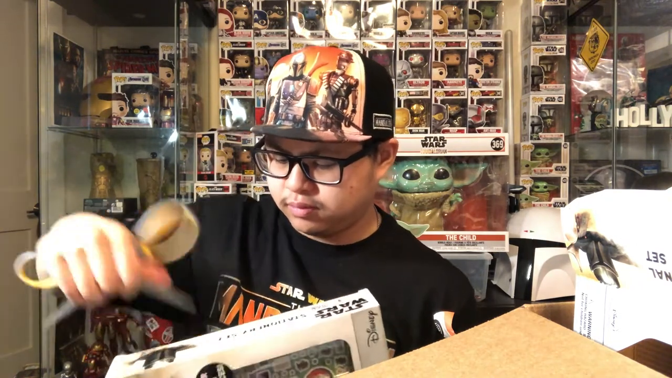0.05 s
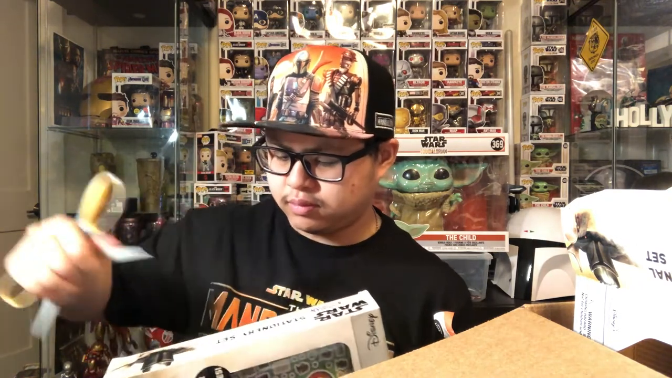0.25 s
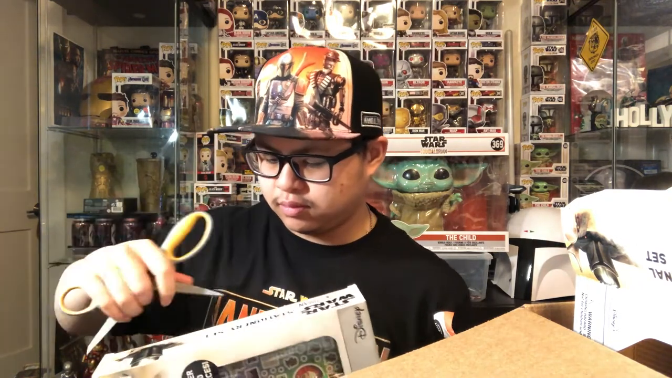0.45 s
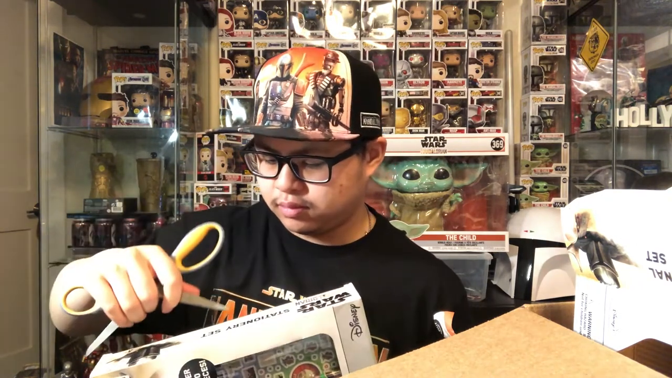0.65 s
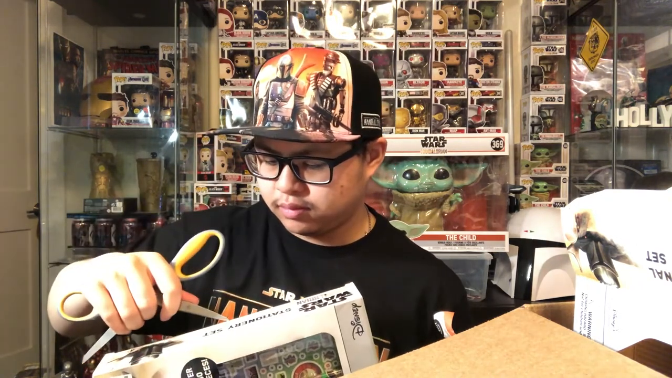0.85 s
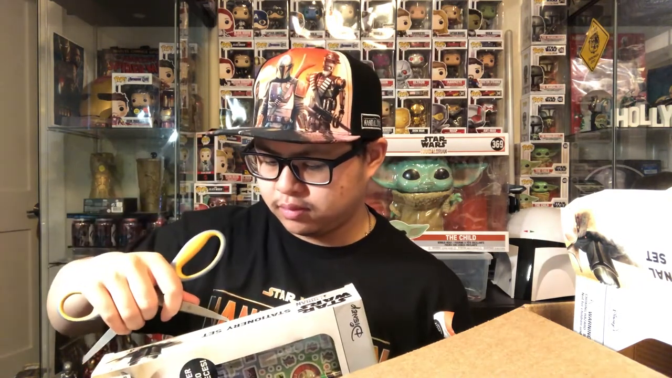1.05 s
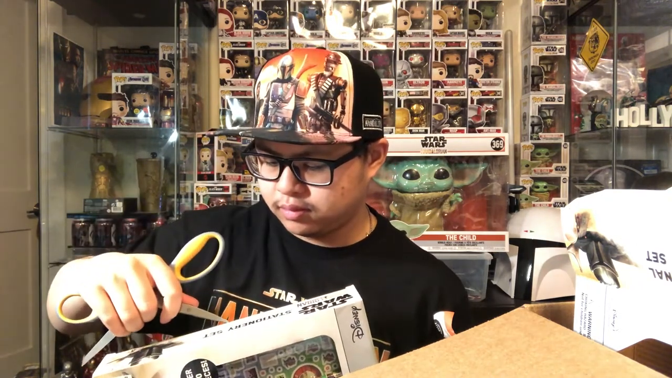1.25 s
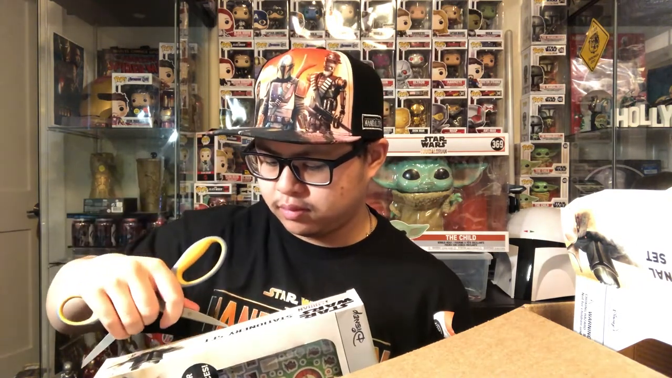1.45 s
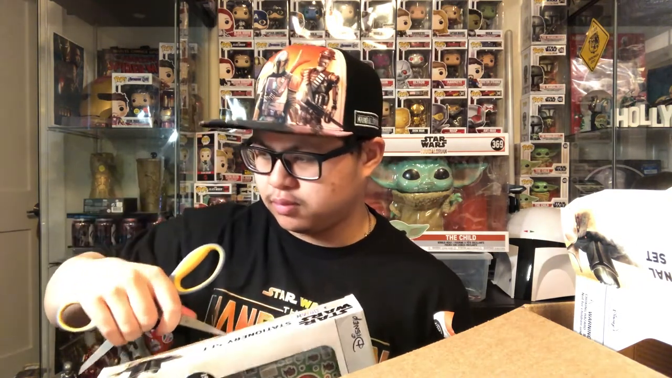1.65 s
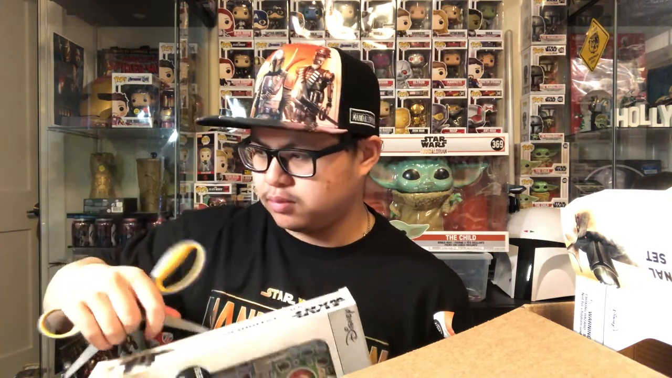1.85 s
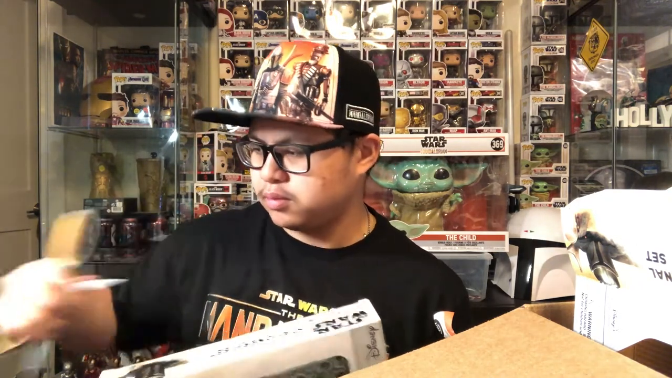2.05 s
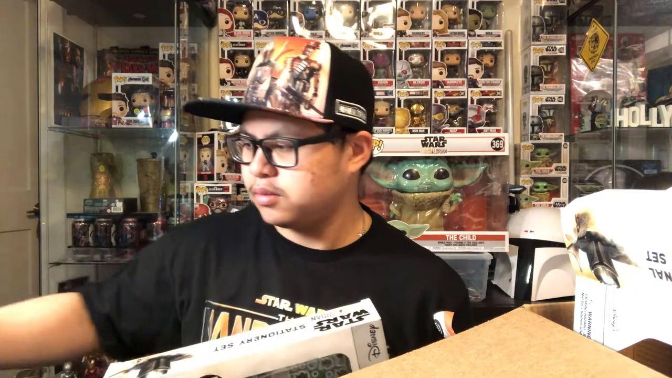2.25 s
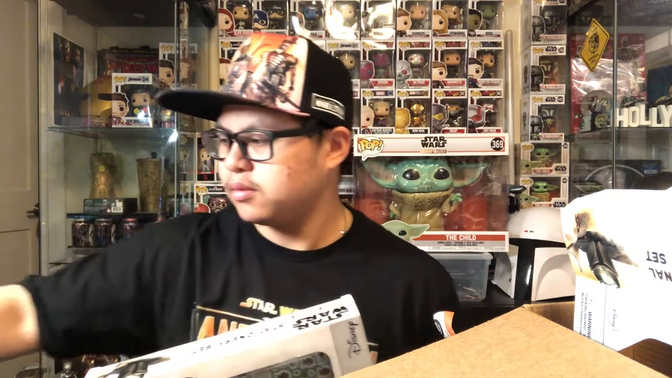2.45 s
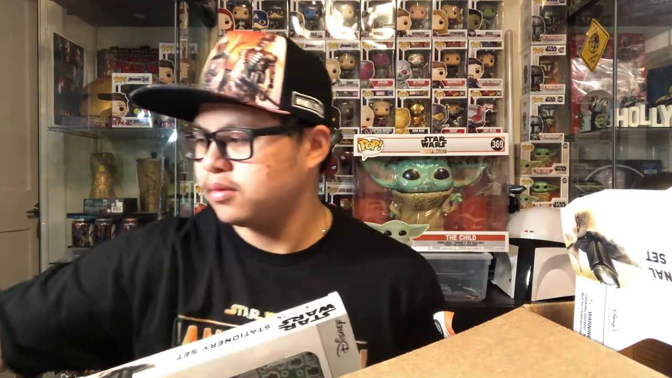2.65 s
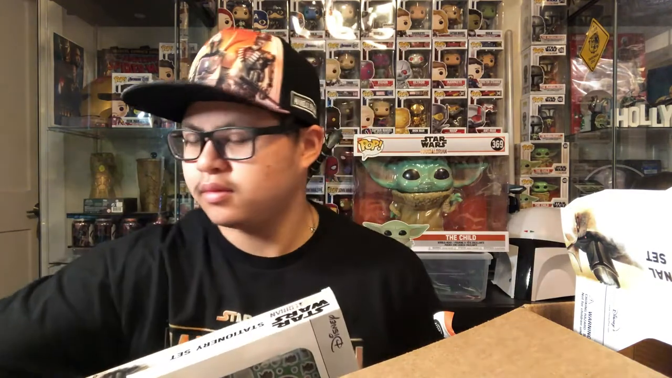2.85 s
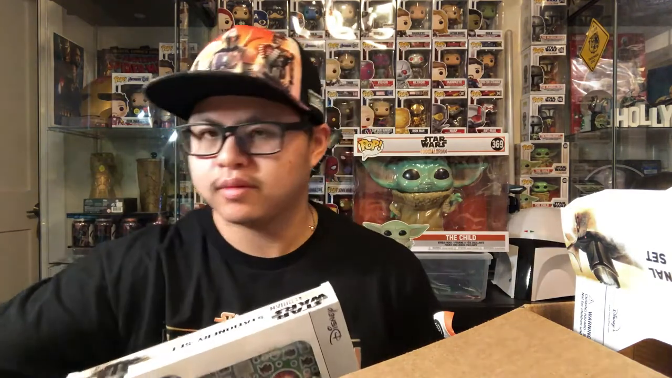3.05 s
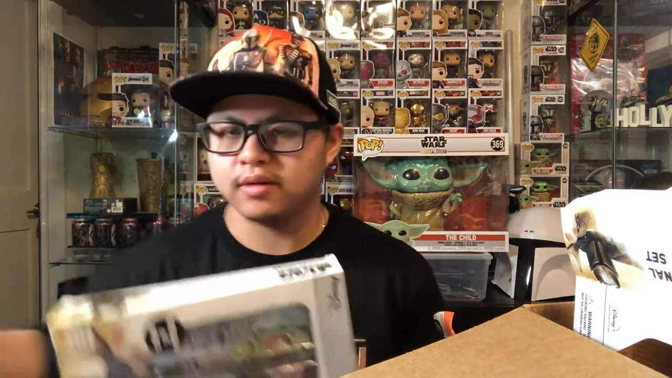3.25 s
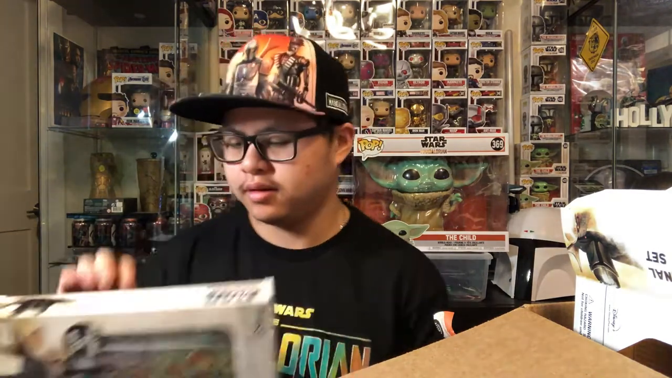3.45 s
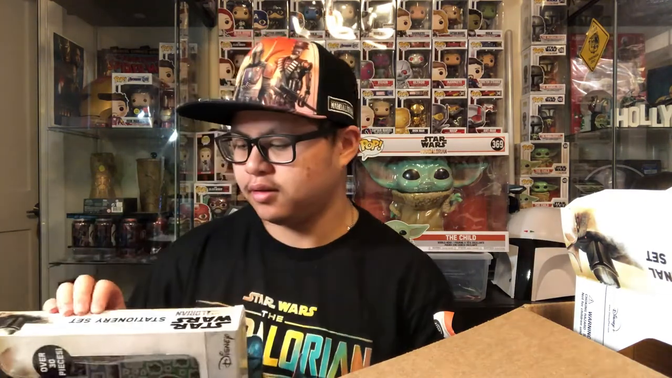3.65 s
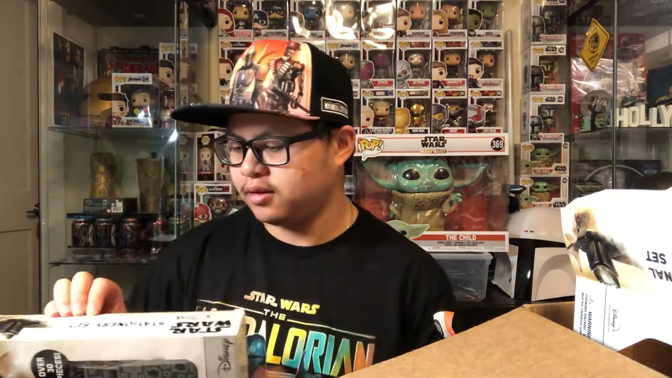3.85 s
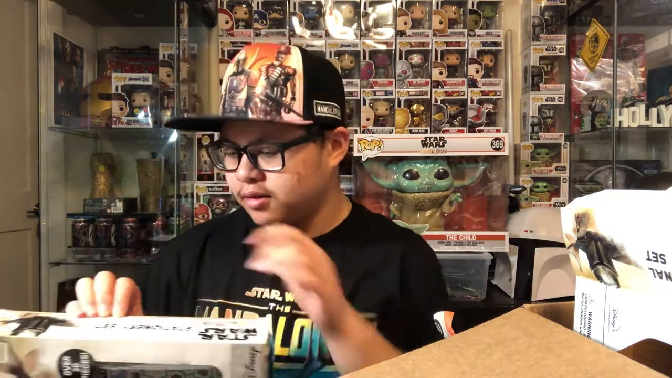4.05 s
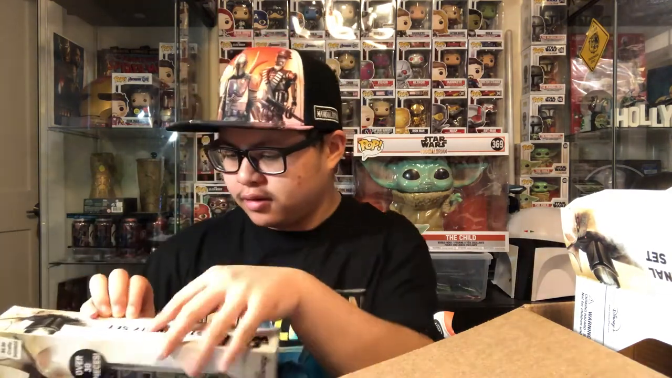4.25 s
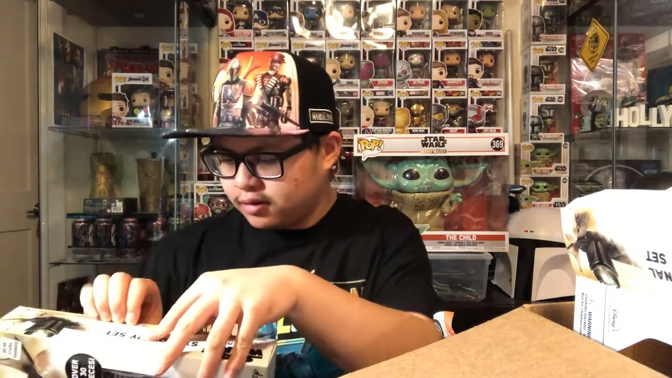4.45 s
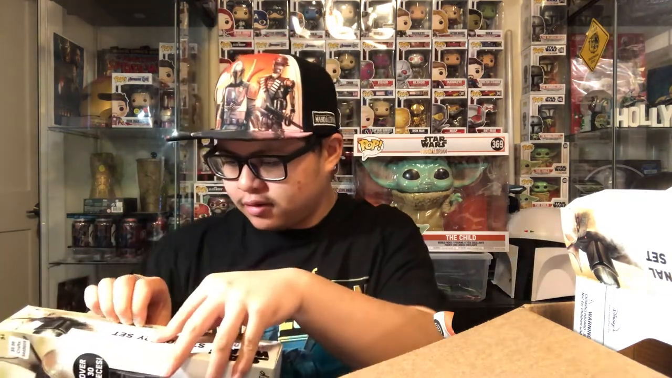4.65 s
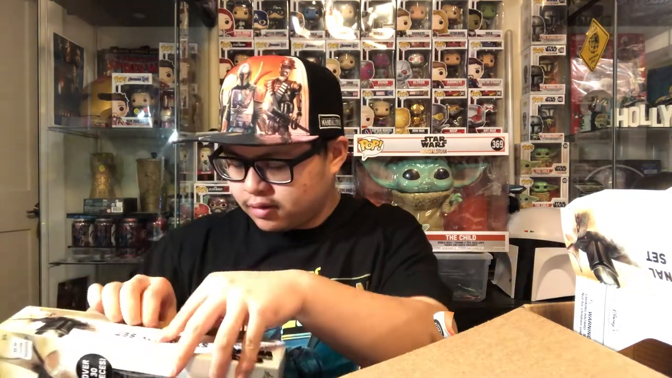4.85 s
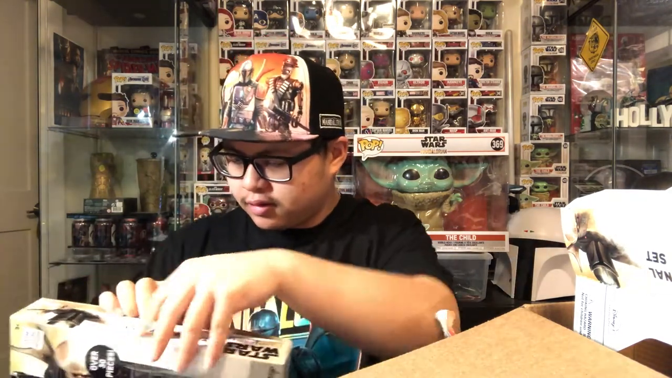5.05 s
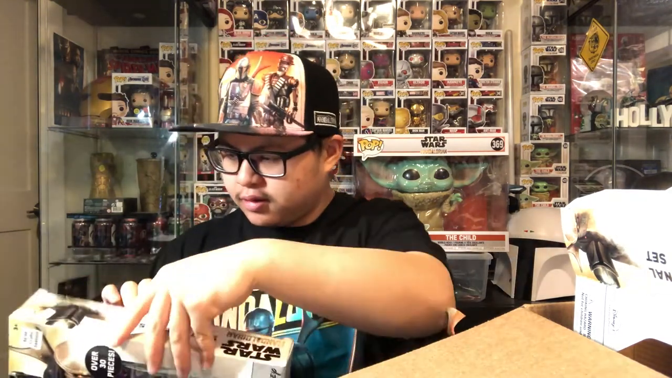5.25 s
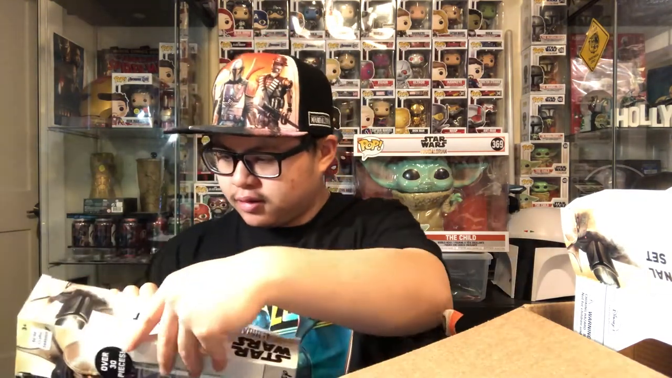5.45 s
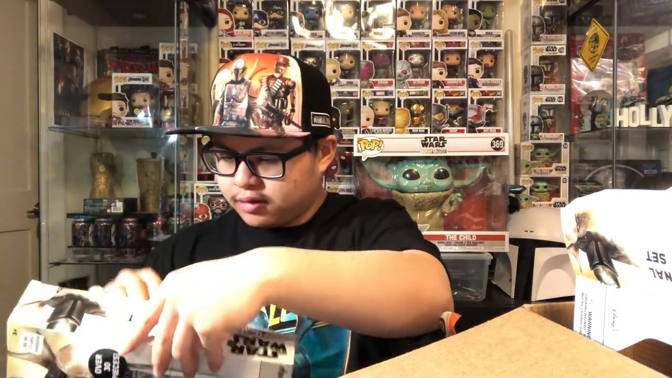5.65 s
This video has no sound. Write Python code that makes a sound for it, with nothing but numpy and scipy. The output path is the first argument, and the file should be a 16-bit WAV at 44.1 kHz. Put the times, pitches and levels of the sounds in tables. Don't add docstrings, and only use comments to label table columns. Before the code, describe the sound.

A cardboard box with a stiff plastic window is opened by hand, close to a camera microphone in a small cluttered room with a short reflection and a very faint low hush. The first 1.4 s are nearly quiet: soft rubbing and tiny taps at about 0.3 and 0.9 s. From 1.4 to 1.6 s tape frees in small sharp slips, then a crisp hollow card pop strikes at 1.72 s, with a weaker one and a short scrape near 1.85 s. After a lull, scissors hit the table at 2.8 s with a hard metallic clack, bounce, and tumble flat by 3.0 s. Light scrapes follow, a click at 3.6 s, knocks at 3.75 s, and fine plastic ticks around 4.1-4.5 s, with a firmer knock at 4.23 s. At 4.7 s the main flap snaps open, the loudest crack, with a dull table thump. Rustling, scraping and plastic crackling continue, densest around 5.25-5.4 s, until the end near 5.7 s.

```python
import sys
import numpy as np
from scipy import signal
from scipy.fft import rfft, irfft, next_fast_len
from scipy.io import wavfile

SR = 44100
rng = np.random.default_rng(int(sys.argv[2]) if len(sys.argv) > 2 else 0)


def unload_wav(signal):
    wavfile.write(
        sys.argv[1],
        SR,
        np.round(np.clip(np.atleast_2d(signal).T, -1, 1) * 32767).astype(np.int16),
    )


def linear_from_db(decibels):
    return 10 ** (np.asarray(decibels, float) / 20)


N = 251370

# [t/s, peak/dB, weight/dB, brightness/dB]
POPS = [(1.696, -28, -24, -36), (1.709, -41.5, -19.5, -8), (1.713, -34.5, -19.5, -14),
        (1.7204, -11, -26, -6.5), (1.7277, -14, -11.5, -13.5), (1.736, -19.5, -16, -35),
        (1.848, -29.5, -14, -33), (3.731, -36, -35, -15), (3.752, -40.5, -36, 2.5),
        (3.996, -46.5, -4, -5.5), (4.045, -40, 6.5, -26), (4.525, -38.5, -42, -23.5),
        (4.577, -61, -21, -33), (4.625, -38.5, -14, -22), (4.933, -30, -31, -20), (4.961, -30.5, -15, -3),
        (5.236, -26, -36, -11.5), (5.3365, -27, 4.5, -6)]
# [t/s, peak/dB, weight/dB, brightness/dB]
FLAPS = [(0.277, -43.5, -6, -29), (0.291, -44, -23, -22), (0.87, -35, -12, -22.5), (1.975, -41.5, -6, -24),
         (3.325, -39, -38, -16), (3.658, -37.5, -25, -18), (3.7535, -37.5, -42, -16),
         (3.771, -23.5, -0.5, -26), (3.911, -45, 11.5, -39), (4.232, -22, -15, -13.5),
         (4.385, -42, -14, -19), (4.408, -38, -23, -14.5), (4.467, -36, -20, -33.5),
         (4.95, -33, -7.5, -16.5), (4.996, -31.5, -14, -20), (5.196, -52, -12, -22),
         (5.2207, -43, -13, -24), (5.267, -35, -24, -3), (5.424, -34.5, -13, -22), (5.665, -34, -15, -21)]
# [f/Hz, level/dB per third octave]
CARD_COLOUR = [(130, -16.5), (300, 1.5), (700, -3), (1400, -4.5), (3200, -3), (7000, 1), (15000, 0.5)]
# [f/Hz, level/dB, T60/s]
BOX_MODES = [(342, -25, 0.03), (621, -11.5, 0.031), (758, -21, 0.043), (941, -28.5, 0.12),
             (1536, -25, 0.034)]
# [t/s, peak/dB]
LID = [
    (4.694, -6.5),
    (4.711, -27),
    (4.747, -37),
]
# [f/Hz, level/dB per third octave]
LID_COLOUR = [(130, -23.5), (300, -24), (620, -2.5), (1250, -5.5), (1700, 3.5), (2300, -3.5), (3200, 2.5),
              (7000, -9.5), (15000, -11)]
# [f/Hz, level/dB, T60/s]
LID_MODES = [(1100, -18, 0.032), (572, -25, 0.097), (624, -19, 0.1), (750, -26, 0.073), (841, -26, 0.12),
             (967, -14.5, 0.1), (1630, -16, 0.044), (1880, -14, 0.063), (2660, -31, 0.034),
             (3590, -13.5, 0.036)]
# [t/s, peak/dB]
CRACKS = [
    (1.7211, -14),
    (3.5968, -26),
    (3.7715, -33),
    (4.6956, -2),
]
# [t/s, peak/dB, weight/dB, brightness/dB]
WINDOW = [(2.115, -56.5, -1.5, -7), (2.176, -46.5, -9, -5.5), (3.5965, -25.5, -26, -11.5),
          (3.785, -38, -25, -6), (3.818, -31.5, -32, -2), (4.088, -42, -32, -8), (4.282, -54, -23, -14),
          (4.672, -49.5, -27, -13), (4.2285, -27.5, -7, -5), (4.6955, -15.5, -22, -8), (4.80, -51, -24, 0),
          (4.885, -44.5, 2, 10.5), (5.558, -39.5, -23, -7), (5.59, -54, -22, -12), (3.142, -44, -20, -16)]
# [t/s, peak/dB, weight/dB, brightness/dB]
CRACKLE = [(5.126, -55, -20, -10), (5.145, -44, -17, -8), (5.255, -52, -20, -11), (5.274, -40, -20, -6),
           (5.281, -35, -20, -8), (5.293, -28, -20, -8), (5.302, -39, -20, -6), (5.324, -33, -6, -9),
           (5.348, -35, -4, -24), (5.357, -43, -15, -15), (5.367, -44, -18, -12), (5.4, -47, -10, -15),
           (5.634, -37, -13, -13)]
# [t/s, peak/dB]
TICKS = [(4.0856, -47), (4.0924, -45), (4.143, -45), (4.1662, -54), (4.17, -39.5), (4.1847, -57),
         (4.198, -42), (4.2024, -45.5), (4.211, -40), (4.2207, -40.5), (4.2286, -50), (4.2544, -51),
         (4.392, -43), (4.3984, -50), (4.4124, -53), (4.4474, -50), (4.542, -43.5)]
# [t/s, peak/dB, brightness/dB]
PEEL = [(1.42, -47, -9), (1.436, -38, -3.5), (1.443, -33, -16), (1.452, -37, -9), (1.471, -32, -19),
        (1.474, -41.5, -6), (1.483, -27.5, -6.5), (1.514, -36, -28), (1.559, -38, -8), (1.574, -24.5, -9),
        (1.596, -44, -21)]
# [f/Hz, level/dB per third octave]
TAPE_COLOUR = [(130, -14), (400, 5.5), (800, -11.5), (1600, -6.5), (3200, -6), (5500, 6.5), (8000, -8.5),
               (11500, 6.5), (16000, -18)]
# [t/s, peak/dB, weight/dB, brightness/dB]
DROP = [
    (2.527, -61, 18.5, -27),
    (2.557, -57, 8, -14),
    (2.814, -14, -12.5, -23),
    (2.832, -6.5, -31, -34.5),
    (2.886, -19, -19, -34),
    (2.926, -29.5, -6, -35),
    (2.977, -16.5, -5, -26.5),
    (3.0, -21.5, -14, -16.5),
    (3.021, -29.5, -10, -26),
]
# [f/Hz, level/dB per third octave]
LANDING_COLOUR = [(130, -10.5), (300, -0.5), (700, -12), (1000, -7), (1600, -3), (2300, 2), (2900, -4.5),
                  (3600, 1), (7000, 11), (11000, -15), (15000, -22.5)]
# [f/Hz, level/dB per third octave]
TUMBLE_COLOUR = [(130, -10.5), (300, -2), (700, -1.5), (1500, -5), (2000, -9), (2400, -8), (2800, -7),
                 (3400, 1), (7000, 5.5), (13000, -24)]
# [f/Hz, level/dB, T60/s]
SCISSOR_MODES = [(290, -24.5, 0.16), (802, -24.5, 0.022), (1018, -9, 0.027), (1500, -15.5, 0.052),
                 (2190, -43.5, 0.056), (2320, -16.5, 0.066), (3647, -19.5, 0.053)]
# [f/Hz, level/dB, T60/s]
TUMBLE_MODES = [(290, -13.5, 0.048), (426, -18, 0.09), (545, -12.5, 0.072), (965, -21, 0.075),
                (1240, -25, 0.078), (1250, -23, 0.1), (1530, -16, 0.12), (1630, -13, 0.065),
                (2320, -10, 0.032), (3220, -22, 0.084)]
# [t/s, peak/dB, f/Hz]
KNOCKS = [(1.7287, -20, 980), (1.7321, -19, 1180), (1.7372, -29, 705), (1.7567, -32, 950),
          (1.848, -37, 1020), (1.8612, -36, 970), (1.8759, -40, 850), (2.8157, -17.5, 1100),
          (2.8341, -6.5, 1520), (2.8364, -11, 960), (2.8455, -31, 8000), (2.86, -35, 6000),
          (2.8414, -18, 1360), (2.8489, -14.5, 2100), (2.8575, -35, 860), (2.864, -35, 1320),
          (2.8715, -32, 600), (2.8973, -27, 890), (2.93, -39, 1000), (2.9794, -17, 1420),
          (2.9825, -25, 325), (2.9906, -19.5, 990), (2.9938, -25, 1410), (3.0174, -27, 1150),
          (3.03, -34, 1490), (3.1068, -48, 1030), (3.1445, -39, 1390), (3.6587, -45.5, 1430),
          (3.7275, -35.5, 7500), (3.7276, -40, 3940), (3.744, -43, 3340), (3.773, -33, 1730),
          (3.7864, -36, 3550), (4.0485, -48, 890), (1.4727, -37.5, 1190), (1.4365, -43, 5300),
          (1.484, -34, 5300), (1.6982, -30.5, 890), (3.835, -44, 1900), (4.69545, -8.5, 2960),
          (4.6989, -12, 716), (4.7135, -18, 790), (4.7326, -25, 860), (5.2377, -28.5, 3040),
          (5.2675, -28, 3340), (5.2791, -31, 1870), (5.2833, -30, 1900), (5.294, -33, 5500),
          (5.3159, -35, 5080), (5.3376, -26.5, 1910), (5.342, -32.5, 405), (5.558, -35, 1100),
          (5.588, -43, 4500)]
# [mid knock at brightness 0/dB, share of brightness it follows/0-1, contact at mean blow/s]
FLAP_KIND = (10.9, 0.92, 0.0075)
POP_KIND = (-4.5, 0.86, 0.0086)
WINDOW_KIND = (14.3, 0.62, 0.0011)
TAPE_KIND = (-3.5, 0.93, 0.0086)
STEEL_KIND = (3.9, 0.35, 0.0076)
# [t/s, level/dB, weight/dB, brightness/dB, length/s]
SCRAPES = [(0.11, -55, -9, -13.5, 0.12), (1.429, -49, -1.5, -17, 0.081), (1.843, -34.5, -7.5, -15.5, 0.046),
           (1.988, -51.5, -3.5, -11, 0.059), (2.84, -22, -15.5, -37, 0.052), (2.982, -30, -2.5, -49, 0.041),
           (3.139, -37, -16, -9.5, 0.1), (3.275, -45, -24, -17, 0.023), (3.278, -47, -21, -24, 0.028),
           (3.36, -49.5, -45, -7, 0.12), (3.428, -39, -20, -12, 0.19), (3.557, -37.5, -6, -19, 0.025),
           (3.734, -45, -1, -11, 0.058), (4.067, -49, -24, -14, 0.11), (4.834, -36, -13, -4, 0.052),
           (4.941, -33.5, -15, -27, 0.033), (5.015, -40.5, -19, -20, 0.054), (5.064, -58.5, -29, 4, 0.65),
           (5.171, -37, -7, -44, 0.12), (5.264, -33.5, -13, -1.5, 0.059), (5.317, -30.5, -6.5, -14, 0.077),
           (5.388, -39.5, -4.5, -21, 0.041), (5.507, -39, -19, -75, 0.14), (5.552, -41.5, 1, -24, 0.04),
           (3.72, -37.5, -24, -15, 0.01), (4.331, -39, -12, -14.5, 0.029),
           (4.423, -42.5, -11.5, -23, 0.029), (4.384, -50, -10, -16, 0.021)]
# [t/s, level/dB, f/Hz, glide/octaves, length/s]
HUMS = [(1.471, -43.5, 590, -0.043, 0.023), (2.843, -25.5, 2206, 0.042, 0.017),
        (3.141, -48, 1447, -0.13, 0.076), (3.16, -46, 900, 0.1, 0.05), (3.167, -50.5, 2584, 0.027, 0.044),
        (3.209, -50.5, 1388, -0.031, 0.045), (5.03, -59.5, 4220, 0.2, 0.087),
        (3.371, -54, 1317, -0.059, 0.075), (3.43, -53.5, 737, -0.011, 0.057),
        (3.451, -46.5, 1415, -0.17, 0.054), (3.561, -52, 1043, -0.16, 0.036),
        (3.727, -44, 1906, 0.0034, 0.011), (3.749, -36.5, 1690, -0.013, 0.0081),
        (3.768, -44, 1850, 0.025, 0.0098), (3.771, -40.5, 319, -0.22, 0.023),
        (3.596, -36, 3360, -0.068, 0.0068), (3.597, -35, 1790, -0.1, 0.0052),
        (4.234, -41, 818, -0.074, 0.03), (1.724, -31, 1005, 0.0057, 0.014),
        (2.981, -36, 1246, 0.041, 0.046), (3.37, -57, 2324, 0, 0.062), (3.443, -54.5, 2320, -0.0046, 0.11),
        (3.449, -56, 3880, -0.054, 0.082), (1.847, -47.5, 947, -0.0083, 0.047),
        (4.296, -52, 701, -0.16, 0.045), (4.408, -50, 2170, 0.052, 0.0079), (4.444, -52, 716, 0.03, 0.018),
        (4.516, -58, 736, -0.12, 0.035), (4.83, -45, 970, 0.011, 0.042), (5.013, -52, 1880, 0.083, 0.067),
        (5.179, -46, 796, 0.16, 0.088), (5.263, -39, 5640, -0.082, 0.058),
        (5.274, -41.5, 1860, -0.21, 0.024), (5.335, -46, 407, 0.077, 0.016),
        (5.539, -51, 1000, 0.099, 0.021)]
# [t/s, pressure/dB, plastic against card/dB]
GRIP = [
    [(0.0, -58, -11.5), (0.24, -80.5, -0.5), (1.3, -77.5, -15), (1.44, -61, -10), (1.62, -68.5, -21.5),
     (1.7, -61, -8), (1.87, -56.5, -15), (1.98, -77, -7), (2.1, -77, -2)],
    [(2.4, -79, -6.5), (2.51, -69.5, -2), (2.8, -68, -3), (2.92, -43, -16), (3.135, -58, -1.5),
     (3.22, -65.5, -4), (3.42, -61.5, 0), (3.64, -61.5, -4), (3.82, -52.5, -9)],
    [(4.09, -76.5, -6), (4.27, -52.5, -5), (4.47, -71, -3), (4.67, -64, -8), (4.74, -37.5, -19),
     (4.85, -56, -4.5), (5.16, -52.5, -3.5), (5.261, -45.5, 2), (5.272, -39, 2), (5.4, -58.5, -12.5),
     (5.7, -51.5, -8.5)],
]
# [f/Hz, level/dB per Hz]
BOOM_COLOUR = [(35, -44.5), (60, 4.5), (288, 3.5), (411, 2.5), (458, -12.5), (500, -33), (650, -2.5),
               (1100, -120)]
# [f/Hz, level/dB per Hz]
RUB_COLOUR = [(180, -27), (300, -41.5), (382, 5), (926, 7.5), (1400, 3), (1910, 1.5), (2520, -28),
              (3000, -40), (3900, -28.5), (6600, -120)]
# [f/Hz, level/dB per Hz]
RUSTLE_COLOUR = [(1180, -26), (2000, 6), (2520, 4), (2770, 6.5), (5460, 4.5), (6420, -4.5), (8000, -35.5),
                 (10400, -47), (17600, -120)]
# [f/Hz, level/dB per Hz]
FIZZ_COLOUR = [(4120, -33.5), (7000, -2), (7460, 4), (8350, -11), (11500, -8.5), (15100, -16.5),
               (16300, -17)]
# [t/s, peak/dB, f/Hz]
THUMPS = [
    (1.5, -47, 71.4),
    (1.731, -50.5, 75),
    (3.49, -44, 76.5),
    (4.273, -48, 70.5),
    (4.7, -36, 74.5),
    (5.34, -56, 80),
    (5.573, -42, 142),
]
# [f/Hz, T60/s]
ROOM_T60 = [(100, 0.82), (400, 0.14), (1500, 0.2), (5000, 0.26), (14000, 0.16)]
# [f/Hz, level/dB]
ROOM_COLOUR = [(100, -21.5), (400, 7), (1500, -2), (5000, 1.5), (14000, 0)]
# [f/Hz, level/dB]
HUSH_COLOUR = [(15, -37.5), (25, -4), (127, -4), (231, -12.5), (258, -7.5), (295, -8.5), (598, -13),
               (723, -13.5), (806, -17.5), (1770, -23.5), (3580, -23.5), (14300, -33), (16400, -33.5)]

MEAN_BLOW_DB, CONTACT_DOUBLES_DB = -41, 55
DULL_SLOPE = 0.32
MEAN_GRIP_DB = -60.5
ROOM_MEAN_S = 0.28
CROSSOVER_HZ = 3000


def rms_one(x):
    return x / np.sqrt(np.mean(x ** 2) + 1e-20)


def at_hz(points, hz):
    table_hz, values = np.array(points)[:, :2].T
    return np.interp(np.log(hz), np.log(table_hz), values)


def band_pass(low, high):
    return signal.butter(2, [low, high], "band", fs=SR, output="sos")


def high_pass(order, hz):
    return signal.butter(order, hz, "high", fs=SR, output="sos")


def coloured(x, spectrum):
    size = next_fast_len(len(x))
    hz = np.maximum(np.arange(size // 2 + 1) * SR / size, 1)
    inside = (hz > spectrum[0][0] / 2) & (hz < spectrum[-1][0] * 1.02)
    shaped = rfft(x, size) * linear_from_db(at_hz(spectrum, hz)) * inside
    return rms_one(irfft(shaped, size)[:len(x)])


def drift(rate):
    r = np.exp(-80 * np.pi * rate / SR)
    slow = signal.lfilter([1], [1, -2 * r, r * r], rng.standard_normal(N // 40 + 2002))[2000:]
    return np.interp(np.arange(N) / 40, np.arange(len(slow)), rms_one(slow))


def grains(per_s, spread_db, clump_db):
    sizes = linear_from_db(spread_db * np.minimum(rng.exponential(1, N), 4)) * rng.choice([-1, 1], N)
    slips = rng.random(N) < per_s / SR
    return sizes * slips * linear_from_db(clump_db * drift(24))


def panel_bands(rows, colour, shape, shake, tune_db):
    t = np.arange(shake.shape[-1]) / SR
    edges = 110 * 2 ** np.arange(0, 7.6, 1 / 3)
    s, db, thud_db, knock_db, crack_db, length = np.transpose(rows)[:, :, None]
    bursts = 0
    for k, (low, high) in enumerate(zip(edges, np.minimum(edges[1:], 0.45 * SR))):
        hz = np.sqrt(low * high)
        octaves = np.log2(hz / 300)
        thud, knock, crack = [np.interp(octaves, [0, 1.2, 2.2, 3.4, 4.6], w) for w in np.eye(5)[[0, 3, 4]]]
        crack = crack + DULL_SLOPE * max(np.log2(hz / 7300), 0)
        level_db = db + thud * thud_db + knock * knock_db + crack * crack_db + at_hz(colour, hz) + tune_db
        force = shape(t, hz, length)
        burst = signal.sosfilt(band_pass(low, high), force * shake[k % len(shake)] + 1e-18)
        force_energy = np.sum(force ** 2, axis=1, keepdims=True)
        burst_energy = np.sum(burst ** 2, axis=1, keepdims=True)
        bursts = bursts + linear_from_db(level_db) * np.sqrt(force_energy / burst_energy) * burst
    out = np.zeros(N + len(t))
    for at, burst in zip((s[:, 0] * SR).astype(int), bursts):
        out[at:at + len(t)] += burst
    return out[:N]


def contacts(rows, kind):
    s, db, weight_db, bright_db = np.transpose(rows)
    knock_db, follows, contact_s = kind
    touch = contact_s * 2 ** ((db - MEAN_BLOW_DB) / CONTACT_DOUBLES_DB)
    return np.transpose([s, db, weight_db, knock_db + follows * bright_db, bright_db, touch])


def snaps(rows, colour, cycles, lag_cycles, kick=0):
    def shape(t, hz, contact):
        rise = np.clip(t * hz / lag_cycles, 0, 1)
        return rise * linear_from_db(-60 * t / (cycles / hz + np.clip(contact, 5e-4, 0.05)))
    noise = rng.standard_normal((2, len(rows), 6000))
    shake = noise + kick * (np.arange(6000) == 16)
    return panel_bands(rows, colour, shape, shake, tune_db=-5.0)


def ringing(rows, modes):
    out, rows = 0, np.array(rows)
    own = rng.standard_normal((len(rows), len(modes)))
    for (hz, db, t60), uneven in zip(modes, own.T):
        clicks = np.full(N, 1e-18)
        start = (rows[:, 0] * SR + SR / hz).astype(int)
        clicks[start] = linear_from_db(rows[:, 1] + db + 2.0 * uneven)
        r, w = linear_from_db(-60 / (t60 * SR)), 2 * np.pi * hz / SR
        out = out + signal.lfilter([0, np.sin(w)], [1, -2 * r * np.cos(w), r * r], clicks)
    return signal.sosfilt(high_pass(4, 220), out)


def box():
    blows = np.concatenate([contacts(FLAPS, FLAP_KIND), contacts(POPS, POP_KIND)])
    return snaps(blows, CARD_COLOUR, cycles=7.8, lag_cycles=2.78) + ringing(FLAPS + POPS, BOX_MODES)


def lid():
    blows = [(s, db, 0, 0, 0, 0.007) for s, db in LID]
    return snaps(blows, LID_COLOUR, cycles=6.9, lag_cycles=1.06) + ringing(LID, LID_MODES)


def cracks():
    out, t = 0, np.arange(N) / SR
    for s, db in CRACKS:
        u = (t - s) * 2 * np.pi * 6500
        out = out + linear_from_db(db) * u * np.exp(0.5 - u ** 2 / 2)
    return out


def window():
    clicks = snaps(contacts(WINDOW, WINDOW_KIND), CARD_COLOUR, cycles=9.9, lag_cycles=3.56, kick=1.85)
    return clicks + snaps(contacts(CRACKLE, WINDOW_KIND), CARD_COLOUR, cycles=8.1, lag_cycles=2.3, kick=3.0)


def film():
    clicks, t = np.full(N, 1e-18), np.arange(60) / SR
    for s, db in TICKS:
        at = int(s * SR)
        clicks[at:at + 60] += linear_from_db(db - 6 - 60 * t / 0.0025) * rms_one(rng.standard_normal(60))
    return signal.sosfilt(high_pass(2, 8500), clicks)


def tape():
    slips = [(s, db, -20, bright_db) for s, db, bright_db in PEEL]
    return snaps(contacts(slips, TAPE_KIND), TAPE_COLOUR, cycles=5.7, lag_cycles=1.24)


def scissors():
    landing, tumble = DROP[:6], DROP[6:]
    out = snaps(contacts(landing, STEEL_KIND), LANDING_COLOUR, cycles=7.1, lag_cycles=0.97)
    out = out + snaps(contacts(tumble, STEEL_KIND), TUMBLE_COLOUR, cycles=7.7, lag_cycles=0.9)
    return out + ringing(landing, SCISSOR_MODES) + ringing(tumble, TUMBLE_MODES)


def knocks():
    out, t = np.zeros(N + SR), np.arange(2000) / SR
    rise_cycles = 0.79
    for s, db, hz in KNOCKS:
        u = t * hz / rise_cycles
        at = int((s - rise_cycles / hz) * SR)
        out[at:at + len(t)] += linear_from_db(db) * u * np.exp(1 - u) * np.sin(2 * np.pi * hz * t)
    return signal.sosfilt(high_pass(2, 250), out[:N])


def scrapes():
    def shape(t, hz, length):
        return np.sin(np.pi * np.clip(t / length, 0, 1) ** 0.44) ** 1.43
    s, db, weight_db, bright_db, length = np.transpose(SCRAPES)
    rows = np.transpose([s, db, weight_db, -1.5 + 0.24 * bright_db, bright_db, length])
    slips = grains(per_s=5000, spread_db=4.0, clump_db=1.6)
    slips = slips[np.arange(len(SCRAPES) * 9000) % N].reshape(-1, 9000)
    patches = [slips * linear_from_db(2 * np.resize(drift(18), slips.shape)) for _ in range(4)]
    return panel_bands(rows, CARD_COLOUR, shape, np.stack(patches), tune_db=-6.0)


def hums():
    out, t = np.zeros(N + SR), np.arange(4000) / SR
    for s, db, hz, glide, length in HUMS:
        u = np.clip(t / length, 0, 1)
        slips = rng.standard_normal((2, 4000))
        width = signal.butter(4, 0.12 * hz, fs=SR, output="sos")
        sway = signal.sosfilt(width, slips[0] + 1j * slips[1])
        cycles = np.cumsum(hz * 2 ** (glide * u)) / SR
        tone = np.real(sway * np.exp(2j * np.pi * cycles))
        at = int(s * SR)
        out[at:at + len(t)] += linear_from_db(db) * np.sin(np.pi * u ** 0.59) * rms_one(tone)
    return out[:N]


def patchy(x, patchy_db, per_s):
    edges, out = 1200 * 2 ** np.arange(0, 4.1, 1 / 3), 0
    for low, high in zip(edges, edges[1:]):
        band = signal.sosfilt(band_pass(low, min(high, 0.45 * SR)), x)
        out = out + linear_from_db(patchy_db * drift(per_s)) * band
    return out


def handling():
    s, grip_db, plastic_db = np.transpose(np.concatenate(GRIP))
    t = np.arange(N) / SR
    plastic_db = np.interp(t, s, grip_db + plastic_db)
    grip_db = np.interp(t, s, grip_db)
    friction = grains(per_s=6000, spread_db=1.5, clump_db=2.6)
    crinkle = grains(per_s=8300, spread_db=2.5, clump_db=2.5) + 0.14 * friction
    crinkle = patchy(crinkle, patchy_db=0.8, per_s=7.0)
    boom_db = -68.5 + 0.59 * (grip_db - MEAN_GRIP_DB)
    fizz_db = -69.5 + 0.85 * (plastic_db - MEAN_GRIP_DB)
    card = linear_from_db(boom_db) * coloured(friction, BOOM_COLOUR) + linear_from_db(grip_db) * coloured(friction, RUB_COLOUR)
    rustle = linear_from_db(plastic_db) * coloured(crinkle, RUSTLE_COLOUR)
    return card + rustle + linear_from_db(fizz_db) * coloured(crinkle, FIZZ_COLOUR)


def table():
    t, out = np.arange(int(0.2 * SR)) / SR, np.zeros(N + SR)
    for s, db, hz in THUMPS:
        at = int(s * SR)
        swell = linear_from_db(db - 60 * t / 0.1) * np.minimum(t / 0.018, 1)
        out[at:at + len(t)] += swell * np.sin(2 * np.pi * hz * t)
    return out[:N]


def mirrors(x, gap=0.00036):
    t, tail = np.arange(int(0.5 * SR)) / SR, 0
    edges = 80 * 2 ** np.arange(0, 7.1)
    for low, high in zip(edges, edges[1:]):
        band = signal.sosfilt(band_pass(low, high), rng.standard_normal(len(t)))
        hz = np.sqrt(low * high)
        tail = tail + band * linear_from_db(at_hz(ROOM_COLOUR, hz) - 60 * t / at_hz(ROOM_T60, hz))
    tail = signal.lfilter(*signal.butter(1, CROSSOVER_HZ, fs=SR), tail * np.clip(t / gap, 0, 1) ** 2)
    return signal.fftconvolve(x, tail * np.sqrt(6 * np.log(10) / (ROOM_MEAN_S * SR)))[:N]


def scatter(x, gap=0.00043):
    out, white = 0, rng.standard_normal((2, N))
    edges = 1280 * 2 ** np.arange(0, 3.8, 1 / 3)
    x = signal.lfilter(*signal.butter(1, CROSSOVER_HZ, "high", fs=SR), x)
    build = np.exp(-1 / (SR * gap))
    for k, (low, high) in enumerate(zip(edges, edges[1:])):
        sos, hz = band_pass(low, high), np.sqrt(low * high)
        fade = linear_from_db(-120 / (at_hz(ROOM_T60, hz) * SR))
        build_and_fade = np.convolve([1, -fade], [1, -build])
        energy = signal.lfilter([1 - build], build_and_fade, signal.sosfilt(sos, x) ** 2)
        level = np.sqrt(np.abs(energy) * 6 * np.log(10) / (ROOM_MEAN_S * SR))
        out = out + linear_from_db(at_hz(ROOM_COLOUR, hz)) * level * rms_one(signal.sosfilt(sos, white[k % 2]))
    return out


def room(x):
    return mirrors(x) + scatter(x)


def hush():
    air = linear_from_db(-68.5) * coloured(rng.standard_normal(N), HUSH_COLOUR)
    return signal.sosfilt(high_pass(6, 38), air)


def scene():
    pack = box() + lid() + cracks() + window() + film() + tape()
    hits = pack + scissors() + knocks() + scrapes() + hums()
    hands = handling()
    tail = linear_from_db(-7.5) * room(hits + 0.44 * hands)
    return (hits + hands + table() + tail + hush())[None]


def top_cut(x):
    return signal.sosfilt(signal.butter(12, 16530, fs=SR, output="sos"), x)


def record(dry):
    top_loss = signal.cheby2(14, 30, 16000, fs=SR, output="sos")
    mix = np.clip(signal.sosfilt(top_loss, dry), -1, 1)
    return top_cut(mix)


dry = scene()
out = record(dry)
unload_wav(out)
```